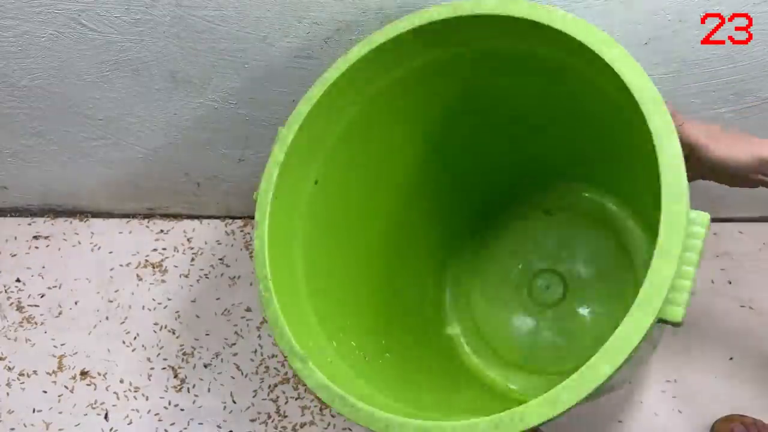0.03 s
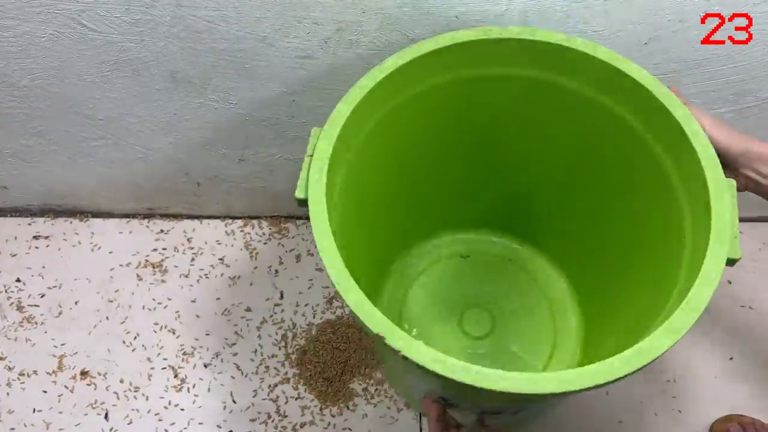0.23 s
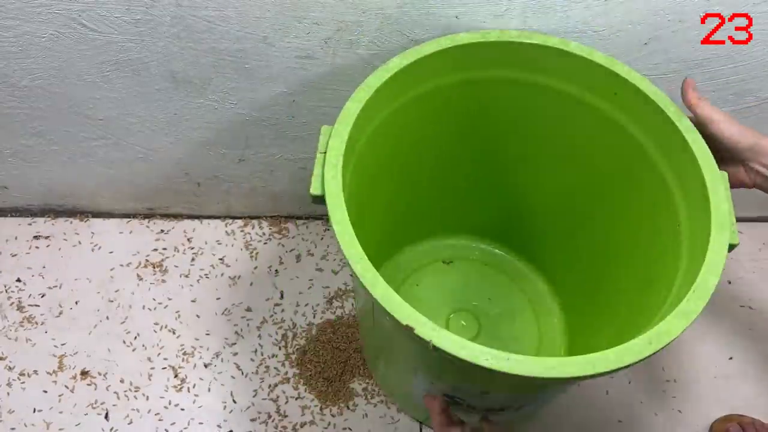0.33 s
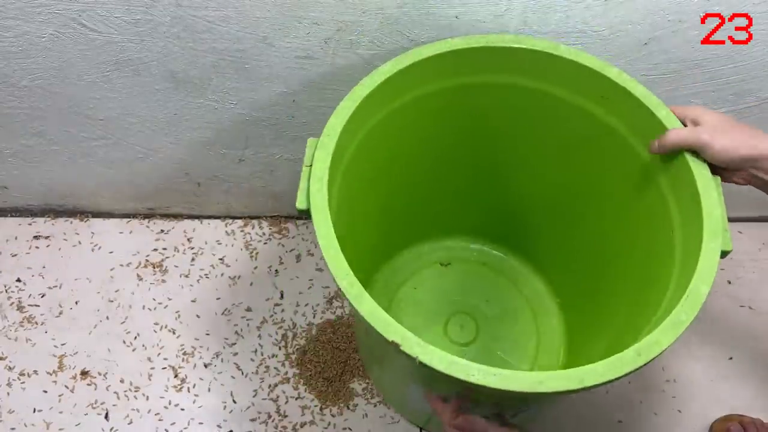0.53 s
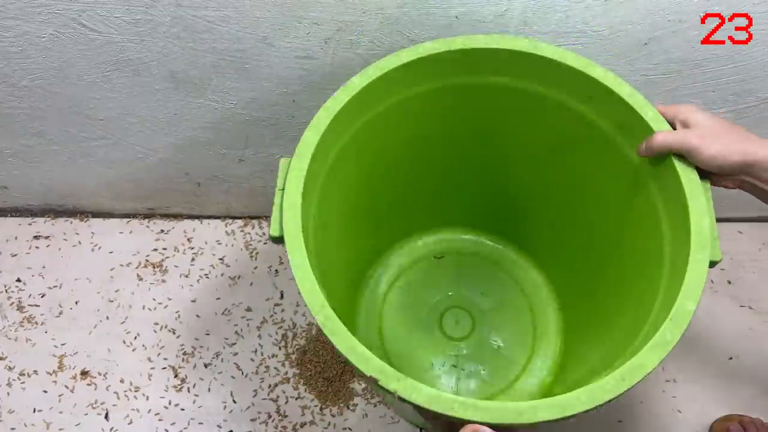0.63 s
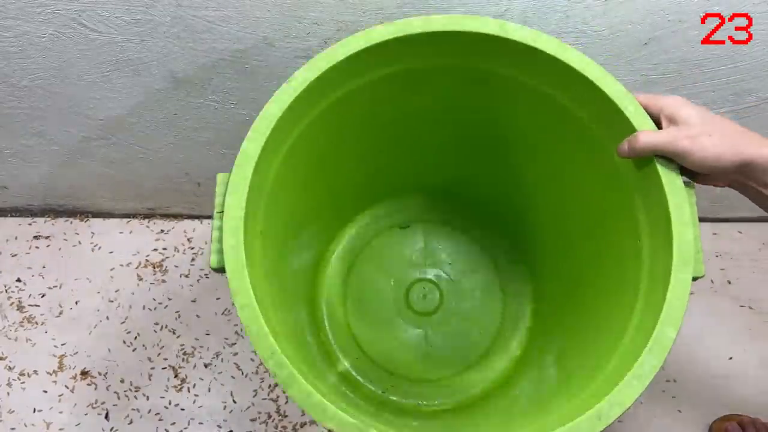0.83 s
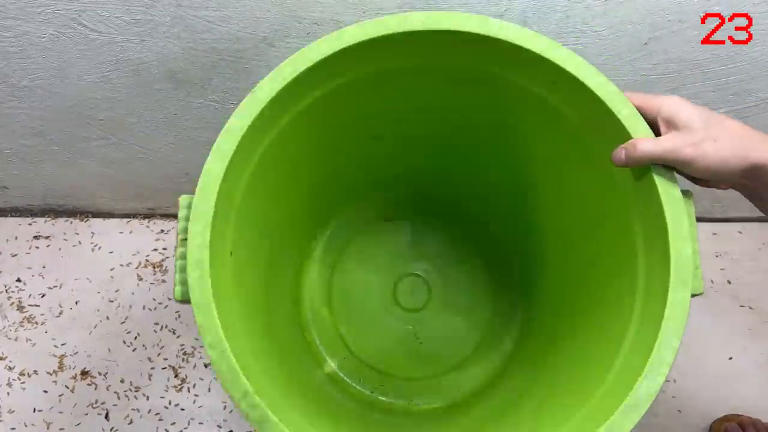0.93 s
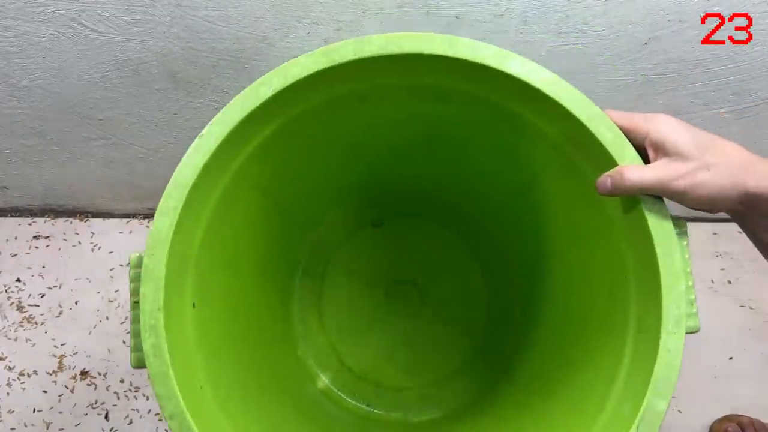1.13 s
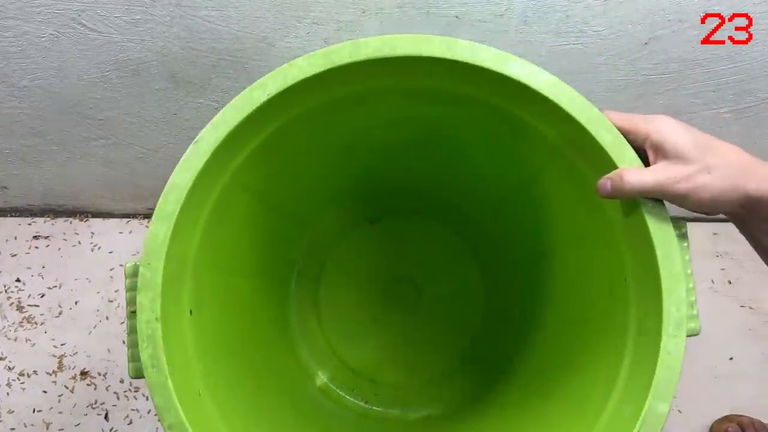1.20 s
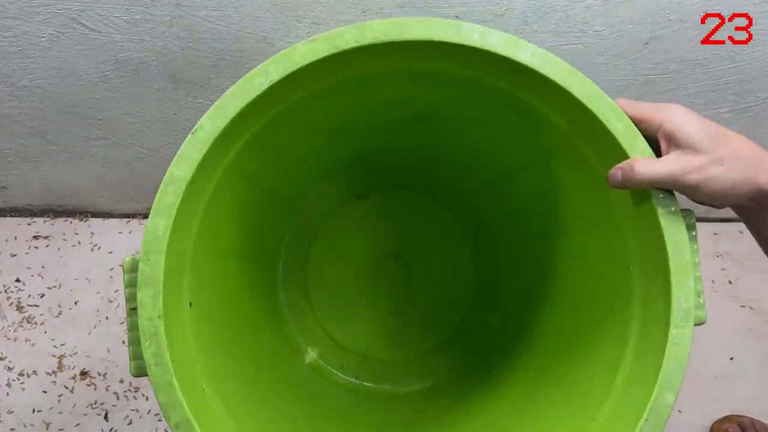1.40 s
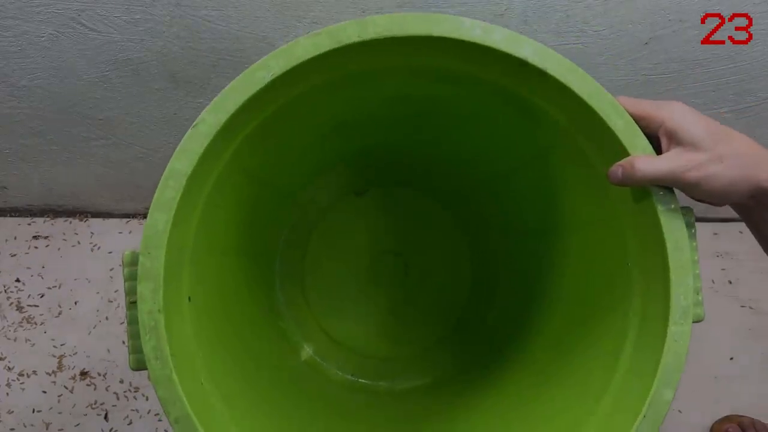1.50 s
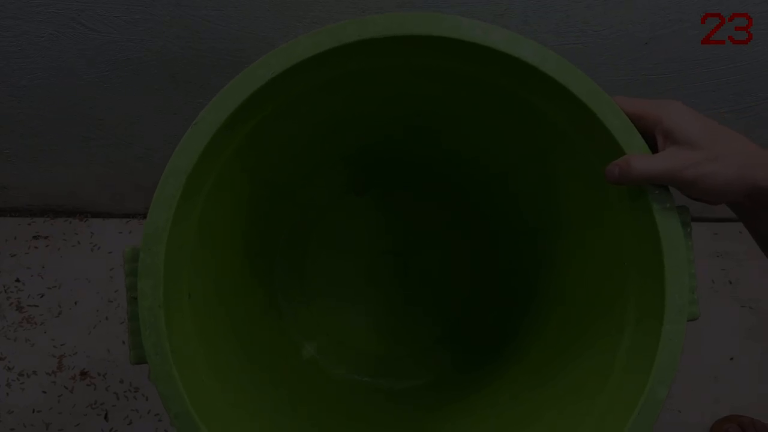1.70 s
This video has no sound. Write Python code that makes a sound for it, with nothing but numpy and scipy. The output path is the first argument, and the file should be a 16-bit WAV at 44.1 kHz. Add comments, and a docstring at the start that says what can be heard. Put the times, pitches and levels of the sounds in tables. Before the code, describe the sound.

An empty plastic bucket thunks onto a hard floor, knocks again and scuffs briefly.

```python
"""Plastic bucket set down.

A big empty bucket meets a hard floor in a small bare room, close to the microphone. Its base lands
with a crack (damped wall modes) and a deep boom (body modes). It rocks onto its foot rim, knocks
again and scuffs over grit in stick-slip clicks. The plastic squeaks faintly under the hand, over
quiet room noise. A broad background hiss swells around the first knocks, then fades."""
import sys
import numpy as np
from scipy import signal
from scipy.fft import rfft, irfft
from scipy.io import wavfile

SR = 44100
rng = np.random.default_rng(int(sys.argv[2]) if len(sys.argv) > 2 else 0)


def file_out(sig):
    """Save sig as 16-bit WAV at sys.argv[1]."""
    # one column per channel
    cols = np.atleast_2d(sig).T
    # limit, then scale
    lim = np.clip(cols, -1, 1)
    pcm = np.round(lim * 32767).astype(np.int16)
    wavfile.write(sys.argv[1], SR, pcm)


N = 77175

# Body modes: pitch_hz, base_struck_db, rim_struck_db, scuffed_db, t60_s
BUCKET_MODES = [(58.3, -12.5, -48, -38, 0.34), (86.4, -10.5, -24, -48.5, 0.34), (122.9, -5, -33, -40, 0.33),
                (152.2, -20, -16, -43, 0.65), (177.7, -15.5, -33.5, -42, 0.62),
                (223.46, -13, -24, -38, .68), (245.4, -19, -28, -35, .5), (303, -25, -30, -33, 0.56),
                (320.2, -35, -22.5, -20, .4), (370.4, -37.5, -22, -32, 0.73), (399, -41, -30, -30, 0.32),
                (435.1, -45.5, -22.5, -40, 0.81), (528, -20.5, -36, -14, 0.11), (616, -31, -14, -7, 0.27),
                (747, -10, -21.5, -33, .08), (756.7, -32, -26.5, -11, 0.47), (883, -19.5, -23.5, 3.5, 0.15),
                (928, -33.5, -24.5, -4.5, 0.061), (1070, -34.5, -27.5, -28, 0.24),
                (1236, -22.5, -31, 4, 0.032), (1401, -29, -25, -3, 0.15), (1526, -17.5, -26.5, -6, .06),
                (2023, -33, -40, -1.5, 0.36), (2234, -18, -35, 2, .035), (2475, -12.5, -37, 0, 0.032),
                (3183, -33.5, -42.5, -4, .07), (3897, -21.5, -42, -9, 0.084), (4210, -20.5, -45.5, -7, .05)]
# Blows that ring the whole bucket: start_s, base_db, rim_db, push_s
FLOOR_BLOWS = [(.2445, -1, -11.5, 0.00018), (.3555, -30, -9.5, 0.00035), (0.3658, -16.5, 2.5, .0005),
               (0.4727, -23, -24, .0005), (0.529, -26, -23, .002), (.7830, -35, -38.5, 0.0065),
               (1.0700, -44, -48, 0.0041)]
# Points of the contact spectra: freq_hz
CONTACT_HZ = [300, 800, 2000, 4500, 8000, 11500, 16000]
# Plastic hitting the floor: start_s, rise_s, t60_s, level_db at each CONTACT_HZ
FLOOR_CRACKS = [(.2420, 0.0031, .040, -32, -13.5, -18, -24.5, -23, -20.5, -19.5),
                (.3220, 0.0048, 0.078, -16.5, -34, -25, -33, -42, -20, -28.5),
                (0.3516, 0.0044, 0.016, -21.5, -15, -25, -29.5, -41, -37.5, -54.5),
                (0.363, .0020, 0.11, -31, -15.5, -34, -51, -43.5, -46.5, -56),
                (0.4008, 0.0011, 0.065, -27.5, -23.5, -37, -40.5, -39.5, -45.5, -50),
                (0.4715, 0.0028, 0.085, -22, -30.5, -31, -37.5, -37.5, -39.5, -61)]
# Foot rim over grit: start_s, rise_s, t60_s, level_db at each CONTACT_HZ, ring_db
FOOT_SCUFFS = [(0.514, 0.018, 0.083, -53, -35, -29, -34.5, -34.5, -35.5, -49, -26),
               (0.638, 0.0016, 0.043, -61.5, -28, -36.5, -54, -41, -44, -60, -31.5),
               (.6490, 0.018, .17, -51.5, -58, -38.5, -54, -53.5, -53.5, -62, -37.5)]
# Hand rubs (narrow), background hiss (broad, third row): start_s, length_s, centre_hz, width_hz, level_db
RUBS_AND_HISS = [(-.12, 0.39, 1070, 820, -55.5), (-.10, 0.25, 580, 46.3, -53.5),
                 (-.10, 1, 8200, 21000, -54), (1.064, 0.06, 1175, 111.1, -66.5),
                 (1.25, 0.23, 2650, 150, -69.5), (1.282, 0.29, 2234, 1202, -73),
                 (1.249, 0.16, 1045, 59.8, -68.5), (1.439, 0.15, 609, 25.23, -63.5)]
# Reverberation: freq_hz, wet_db, t60_s
ROOM_DECAY = [(150, -5, .55), (396, -1.5, 0.57), (1000, -2.5, .52), (2193, -2, 0.43), (4170, 0, 0.39),
              (7960, -1, 0.36), (14260, -5.5, .42)]
# Stereo image (pan is left minus right): freq_hz, direct_side_db, room_side_db, pan_db
STEREO_IMAGE = [(80, -22, -18, -7), (300.7, -10, -2, -2.6), (980, -9.5, 1.5, -0.3), (4400, -7, -3, 3),
                (8000, -7.5, -2, 2)]
# Room noise spectrum: freq_hz, relative_db
NOISE_SPECTRUM = [(20, -10), (45, -6), (85, 1), (112, -13.5), (150, -7), (370, -22), (650, -24.5),
                  (1100, -29), (2200, -35.5), (3500, -41), (5300, -42.5), (6000, -31), (7000, -42.5),
                  (7700, -32.5), (9000, -40.5), (12000, -36), (15500, -33.5)]

BANDS_HZ = 180 * 2 ** (np.arange(14) / 2)
BOOM_LAG_S, BOOM_BELOW_HZ, RING_PAN_DB = 0.009, 285.4, -2.1
GRIT_CLICKS_PER_S, GRIT_RUB_GAIN = 2500, 0.8
ROOM_ONSET_S, RING_SEND_DB = 0.01, -10
NOISE_DB, NOISE_REF_S, NOISE_FALL_DB_PER_S = -52, 1.5, 2.5
JOIN_FROM_HZ, JOIN_FULL_HZ, JOIN_LAG_S = 7700, 8450, 0.000281
LOW_CUT_HZ, HIGH_CUT_HZ = 37, 15900


def bucket_ring():
    """Blows ring the body modes, weighted by where they land. Low modes lag as the base flexes."""
    image_hz, side_db, _, _ = np.array(STEREO_IMAGE).T
    out = np.zeros((2, N))
    for k, (hz, base_struck_db, rim_struck_db, _, t60_s) in enumerate(BUCKET_MODES):
        lag_s = BOOM_LAG_S / (1 + (hz / BOOM_BELOW_HZ) ** 4)
        force = np.zeros(N)
        for start_s, base_db, rim_db, push_s in FLOOR_BLOWS:
            strength = undb(base_db + base_struck_db) + undb(rim_db + rim_struck_db)
            force[int((start_s + lag_s) * SR)] += strength / np.hypot(1, hz * push_s / 2)  # long: duller
        ring = mode(force, hz, t60_s)
        out += spread(ring.imag, (-1) ** k * ring.real, at_hz(hz, image_hz, side_db), RING_PAN_DB)
    return out


def wall_contacts(t, contacts, drive):
    """Dense, quickly damped wall modes answer each contact, band by band."""
    envelopes = [swell(t, *row[:3]) for row in contacts]
    spectra_db = [row[3:3 + len(CONTACT_HZ)] for row in contacts]
    image_hz, side_db, _, pan_db = np.array(STEREO_IMAGE).T
    side = rng.standard_normal(N)
    out = 0
    for hz in BANDS_HZ:
        power = sum((env * undb(at_hz(hz, CONTACT_HZ, db))) ** 2 for env, db in zip(envelopes, spectra_db))
        carrier = spread(band(drive, hz), band(side, hz),
                         at_hz(hz, image_hz, side_db), at_hz(hz, image_hz, pan_db))
        out += np.sqrt(power) * carrier
    return out


def scuff_ring(t):
    """Stick-slip clicks of the scuffs make the body modes chatter."""
    force = grit() * sum(swell(t, *row[:3]) * undb(row[-1]) for row in FOOT_SCUFFS)
    ring = sum(undb(db) * unit(mode(force, hz, t60_s).imag) for hz, _, _, db, t60_s in BUCKET_MODES)
    return unit(ring) * np.std(force)


def grit():
    """Dense stick-slip clicks over smooth rubbing."""
    clicks = (rng.random(N) < GRIT_CLICKS_PER_S / SR) * rng.standard_normal(N)
    return unit(clicks) + GRIT_RUB_GAIN * rng.standard_normal(N)


def rubs_and_hiss(t):
    """Noise bands that swell and fade: narrow hand squeaks, and broad hiss around the first knocks."""
    out = 0
    for start_s, length_s, hz, width_hz, level_db in RUBS_AND_HISS:
        b, a = signal.iirpeak(hz, hz / width_hz, fs=SR)
        mid, side = signal.lfilter(b, a, signal.lfilter(b, a, rng.standard_normal((2, N))))
        progress = np.clip((t - start_s) / length_s, 0, 1)
        envelope = np.sqrt(np.abs(np.sin(np.pi * progress)))
        out += undb(level_db) * envelope * spread(unit(mid), unit(side), side_db=-6, pan_db=1)
    return out


def room_reverb(t, send):
    """Diffuse reverberation of bare walls, shorter in the treble."""
    room_hz, wet_db, t60_s = np.array(ROOM_DECAY).T
    image_hz, _, side_db, pan_db = np.array(STEREO_IMAGE).T
    mid, side = rng.standard_normal((2, N))
    onset = 1 - np.exp(-(t / ROOM_ONSET_S) ** 2)
    response = 0
    for hz in BANDS_HZ:
        envelope = onset * fade(t, at_hz(hz, room_hz, t60_s))
        band_share = hz / np.sqrt(2) / SR
        gain = undb(at_hz(hz, room_hz, wet_db)) * np.sqrt(band_share / np.sum(envelope ** 2))
        carrier = spread(band(mid, hz), band(side, hz),
                         at_hz(hz, image_hz, side_db), at_hz(hz, image_hz, pan_db))
        response += gain * envelope * carrier
    return signal.fftconvolve(send[None], response, axes=1)[:, :N]


def room_noise(t):
    """Low rumble and thin hiss, slowly fading. Bass is near mono."""
    hz, db = np.array(NOISE_SPECTRUM).T
    image_hz, _, side_db, _ = np.array(STEREO_IMAGE).T
    mid = noise(hz, db)
    side = noise(hz, db + at_hz(hz, image_hz, side_db))
    level_db = NOISE_DB - NOISE_FALL_DB_PER_S * (t - NOISE_REF_S)
    return undb(level_db) * spread(mid, side, side_db=-9, pan_db=0.7)


def mode(force, hz, t60_s):
    """Damped resonance with a smooth onset; real and imaginary parts in quadrature."""
    pole = np.exp((2j * np.pi * hz - np.log(1000) / t60_s) / SR)
    onset = pole * np.exp(-4 * hz / SR)
    return signal.lfilter([0, pole - onset], [1, -pole - onset, pole * onset], force)


def swell(t, start_s, rise_s, t60_s):
    """Linear rise, exponential decay."""
    return np.clip((t - start_s) / rise_s, 0, 1) * fade(t - start_s - rise_s, t60_s)


def fade(t, t60_s):
    """1 until t = 0, then exponential decay."""
    return np.exp(-np.log(1000) * np.maximum(t, 0) / t60_s)


def band(x, hz):
    """Half-octave band, rms 1."""
    edge = 2 ** 0.25
    return unit(signal.sosfilt(signal.butter(3, [hz / edge, hz * edge], "band", fs=SR, output="sos"), x))


def noise(hz, db):
    """Noise with spectrum (hz, db), rms 1."""
    bins_hz = np.maximum(np.fft.rfftfreq(N, 1 / SR), 1)
    return unit(irfft(rfft(rng.standard_normal(N)) * undb(at_hz(bins_hz, hz, db)), N))


def spread(mid, side, side_db, pan_db):
    """Mid/side to left/right."""
    sign = np.array([[1], [-1]])
    return (mid + sign * undb(side_db) * side) * undb(sign * pan_db / 2)


def at_hz(hz, points_hz, values):
    """Interpolate over log frequency."""
    return np.interp(np.log(hz), np.log(points_hz), values)


def undb(db):
    """Decibels to gain."""
    return 10 ** (np.asarray(db) / 20)


def unit(x):
    """Scale to rms 1."""
    return x / np.sqrt(np.mean(x ** 2))


def join_treble(x):
    """Above the crossover both channels carry one signal, a short lag apart."""
    hz = np.fft.rfftfreq(N, 1 / SR)
    spectrum = rfft(x)
    share = np.interp(hz, [JOIN_FROM_HZ, JOIN_FULL_HZ], [0, 1])
    phase_rad = 2 * np.pi * np.maximum(hz - JOIN_FULL_HZ, 0) * np.array([[0], [JOIN_LAG_S]])
    joined = spectrum.mean(axis=0) * np.exp(1j * phase_rad)
    return irfft((1 - share) * spectrum + share * joined, N)


def scene():
    """Bucket, hand and hiss in the room, stereo."""
    t = np.arange(N) / SR
    body = bucket_ring() + scuff_ring(t)
    cracks = wall_contacts(t, FLOOR_CRACKS, rng.standard_normal(N))
    scuffs = wall_contacts(t, FOOT_SCUFFS, grit())
    background = room_noise(t)
    send = (cracks + scuffs + undb(RING_SEND_DB) * body).mean(axis=0)
    return body + cracks + scuffs + room_reverb(t, send) + rubs_and_hiss(t) + background


def record(dry):
    """Recorder: treble join, low cut, soft clip, high cut."""
    low_cut = signal.butter(4, LOW_CUT_HZ, "high", fs=SR, output="sos")
    high_cut = signal.ellip(8, 0.2, 80, HIGH_CUT_HZ, fs=SR, output="sos")
    thinned = signal.sosfilt(low_cut, join_treble(dry))
    clipped = thinned / (1 + (thinned / 0.98) ** 8) ** (1 / 8)
    return signal.sosfilt(high_cut, clipped)


dry = scene()
out = record(dry)
file_out(out)
```